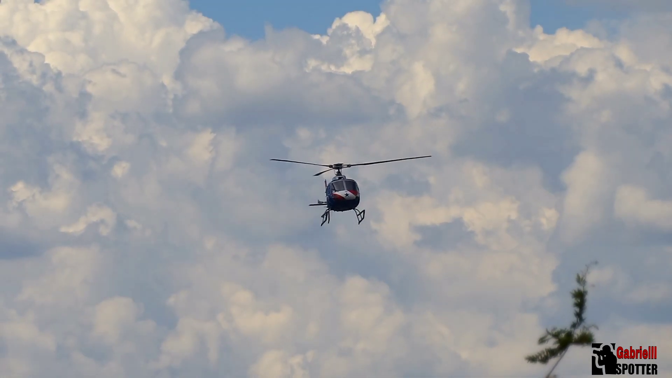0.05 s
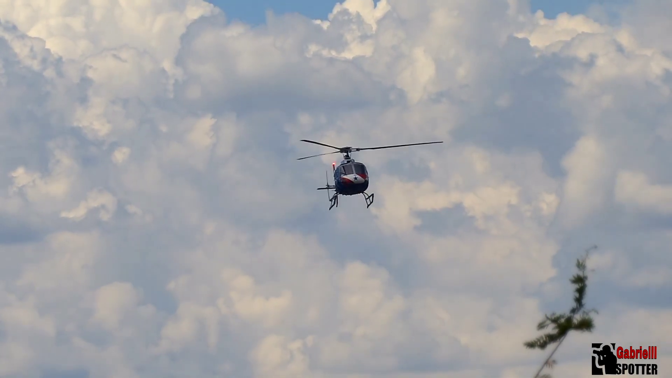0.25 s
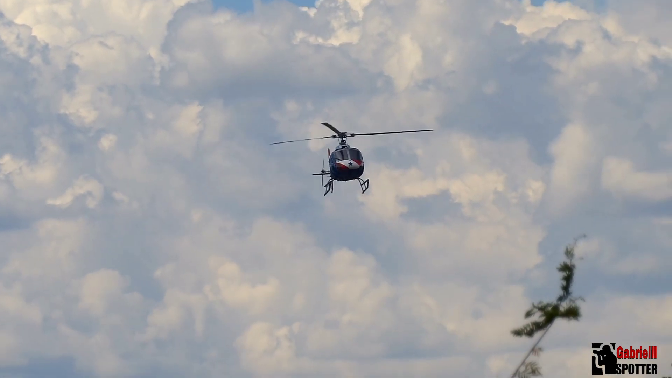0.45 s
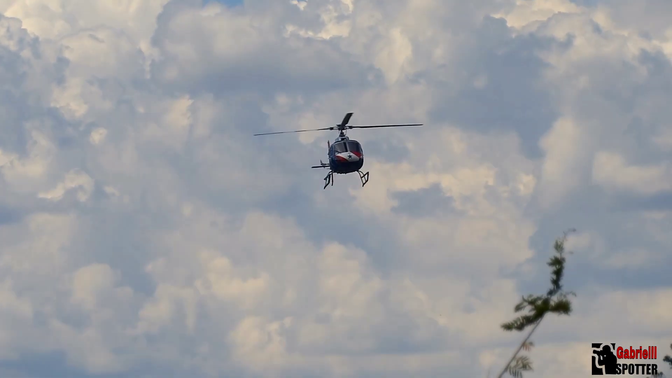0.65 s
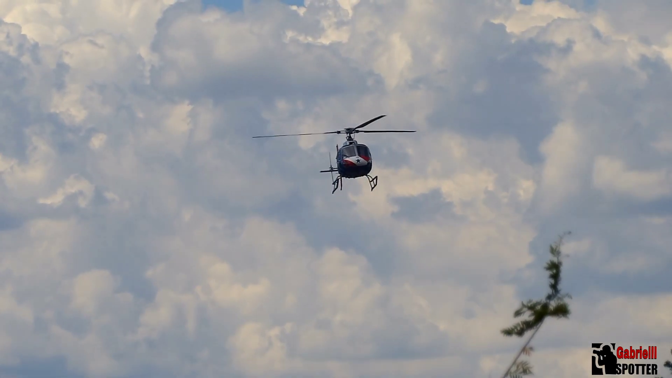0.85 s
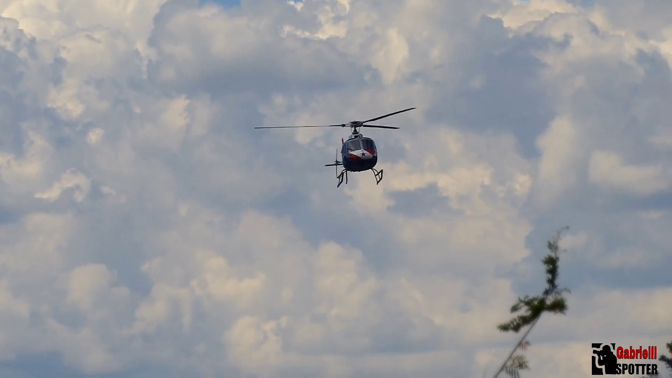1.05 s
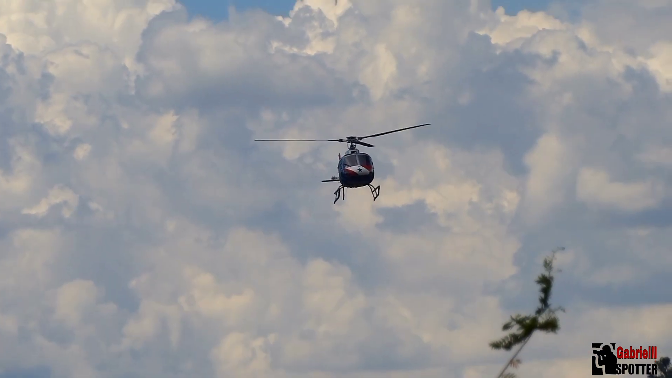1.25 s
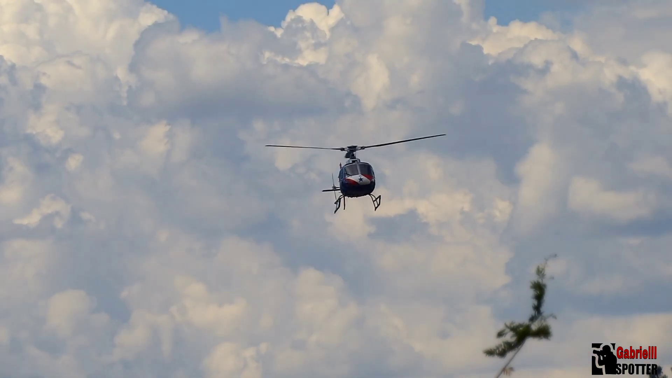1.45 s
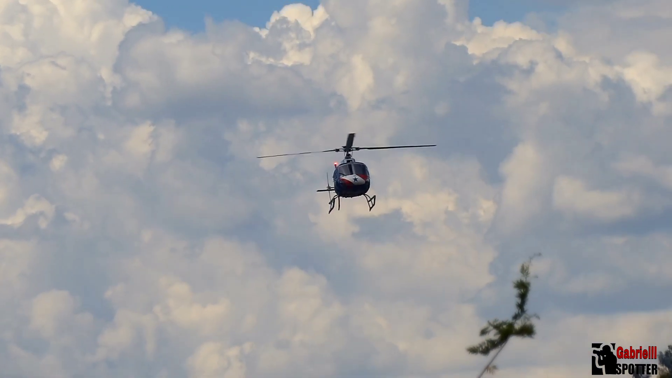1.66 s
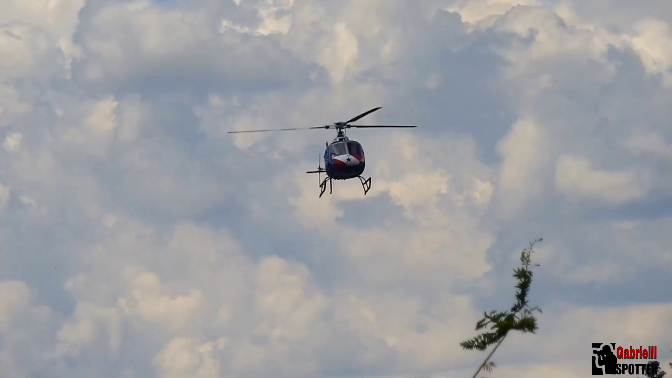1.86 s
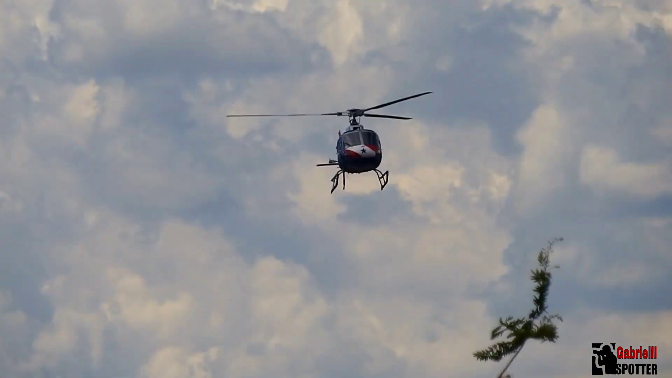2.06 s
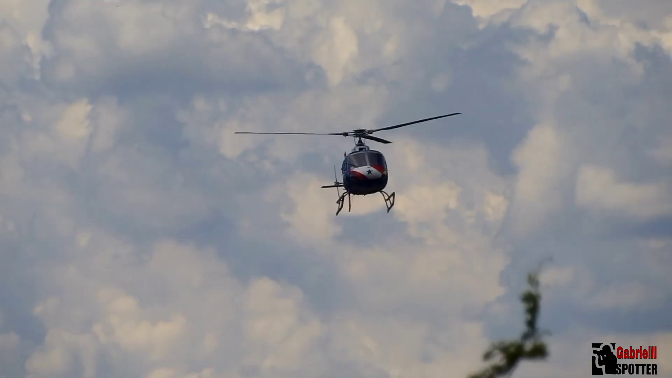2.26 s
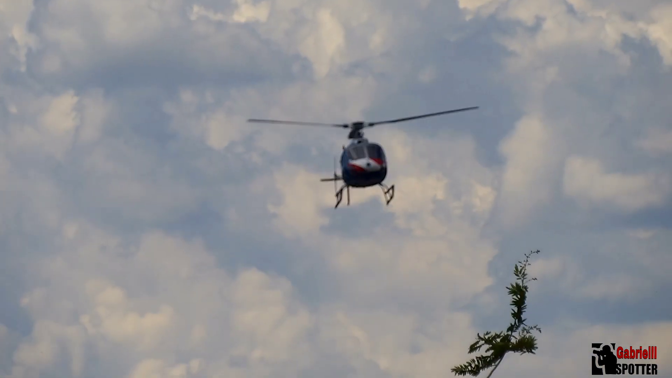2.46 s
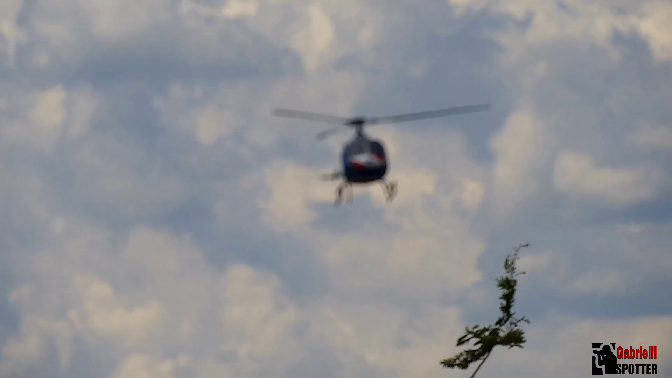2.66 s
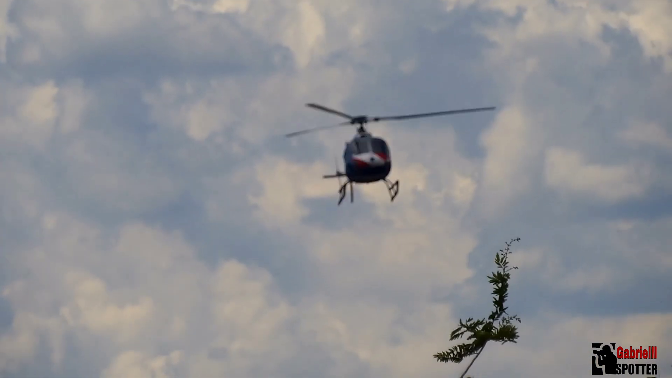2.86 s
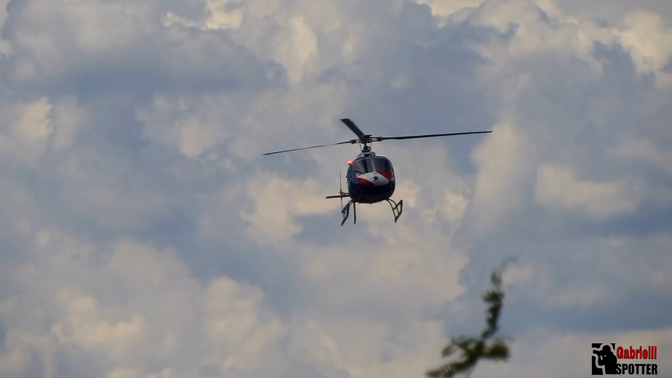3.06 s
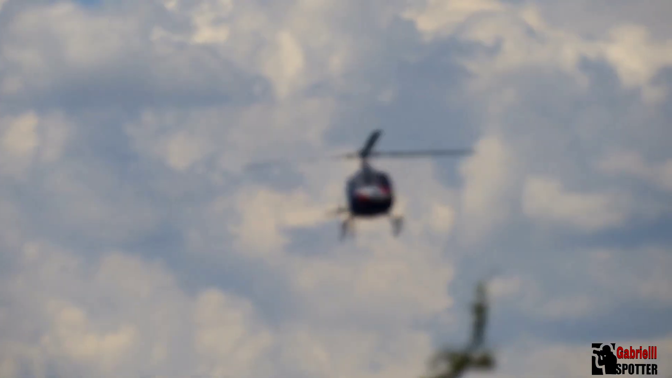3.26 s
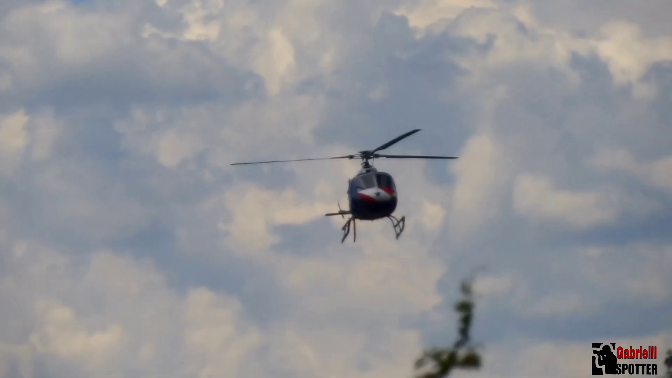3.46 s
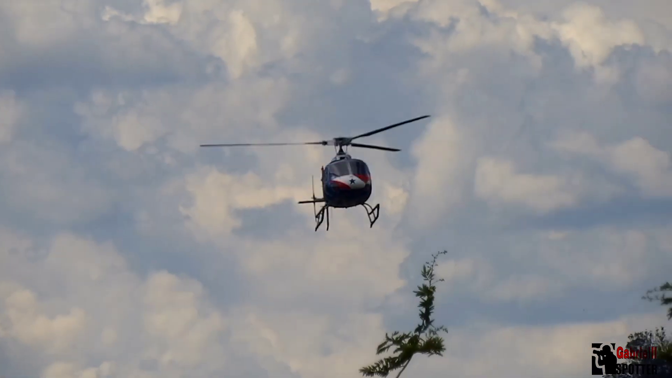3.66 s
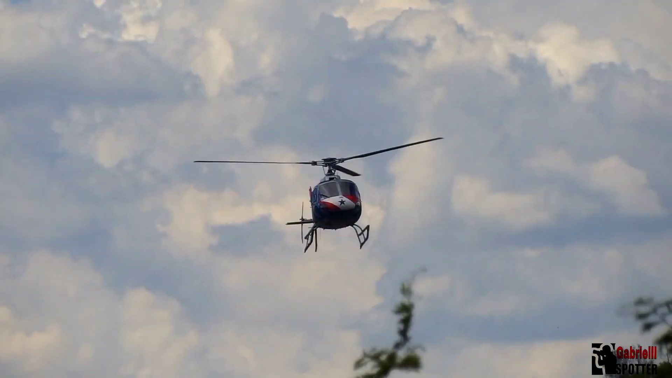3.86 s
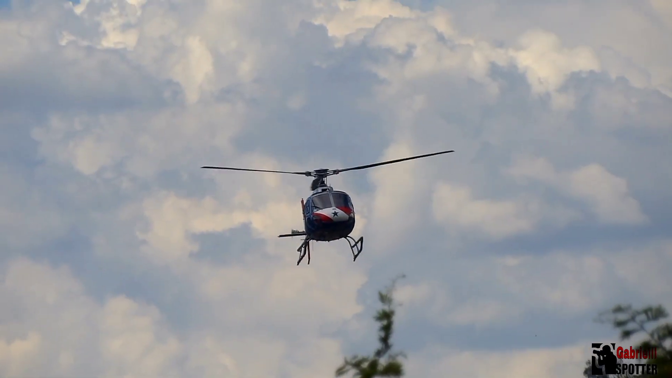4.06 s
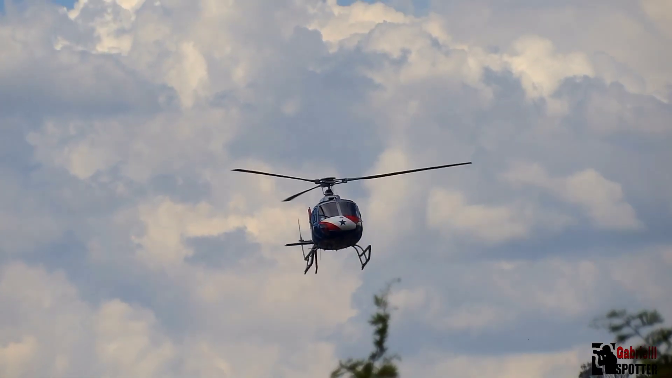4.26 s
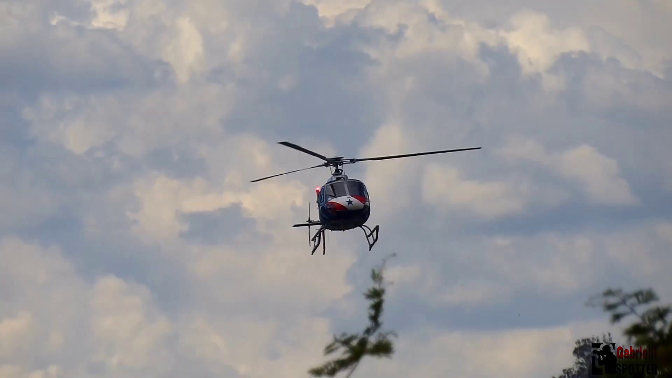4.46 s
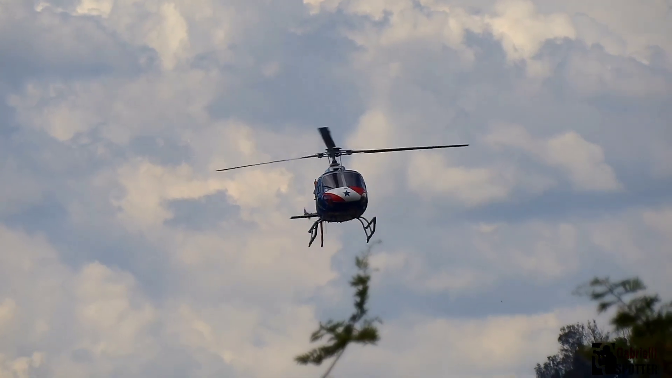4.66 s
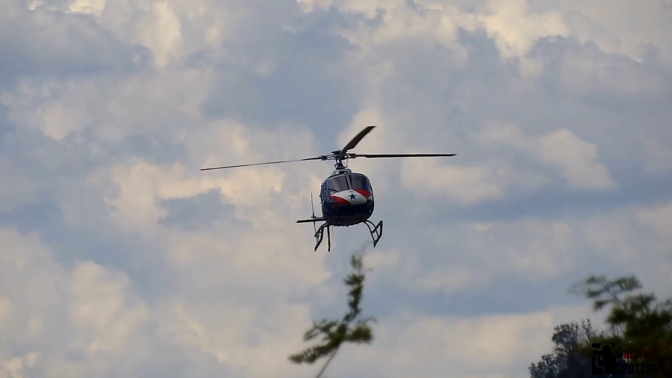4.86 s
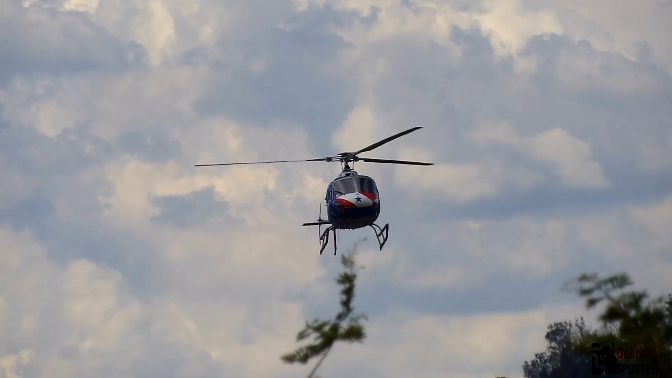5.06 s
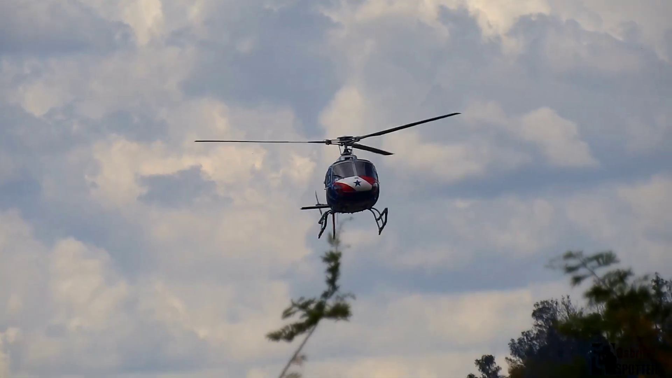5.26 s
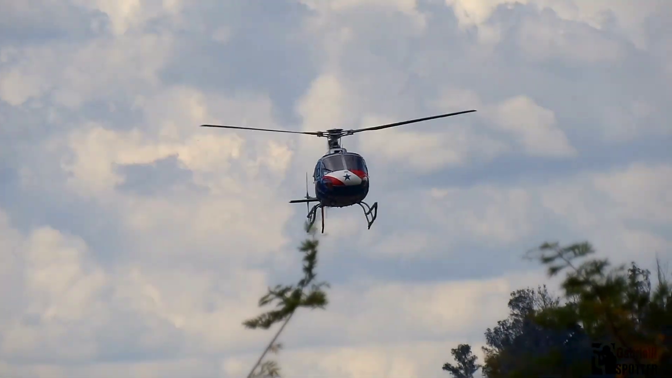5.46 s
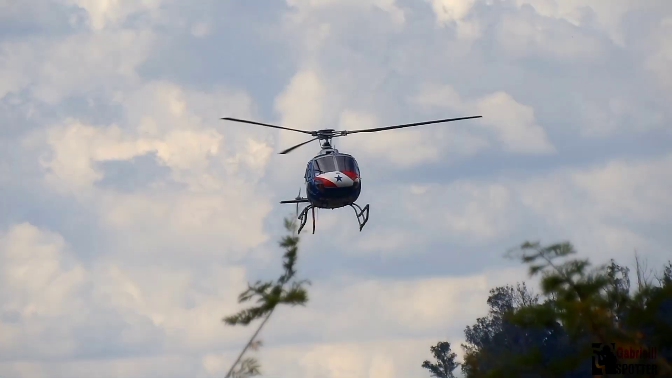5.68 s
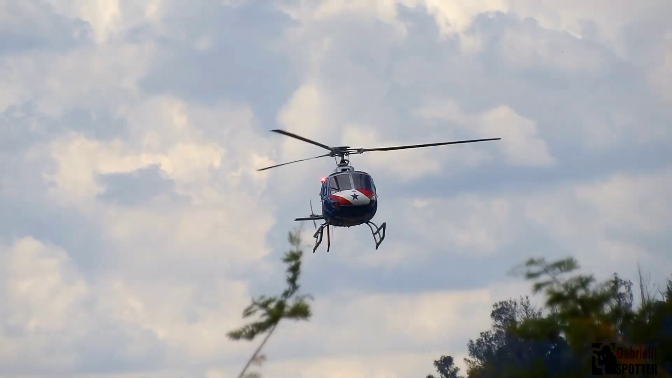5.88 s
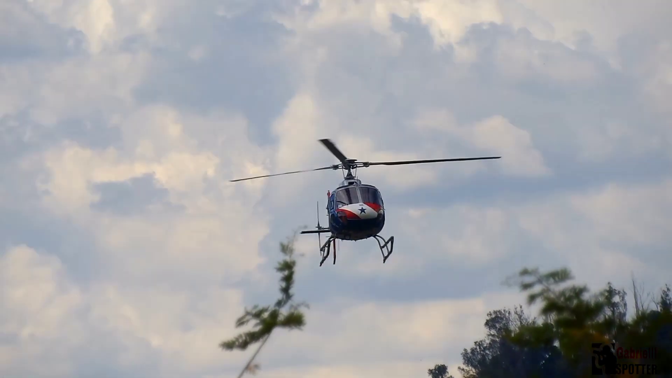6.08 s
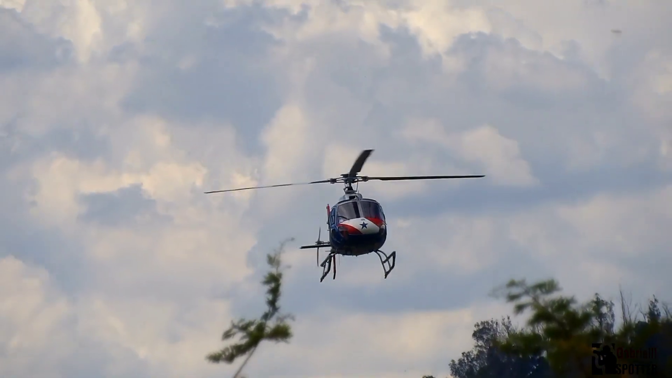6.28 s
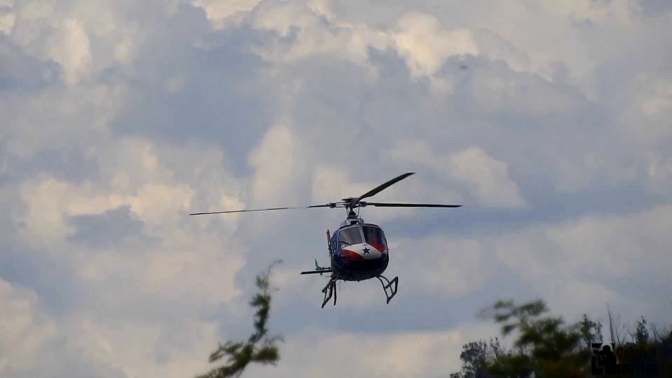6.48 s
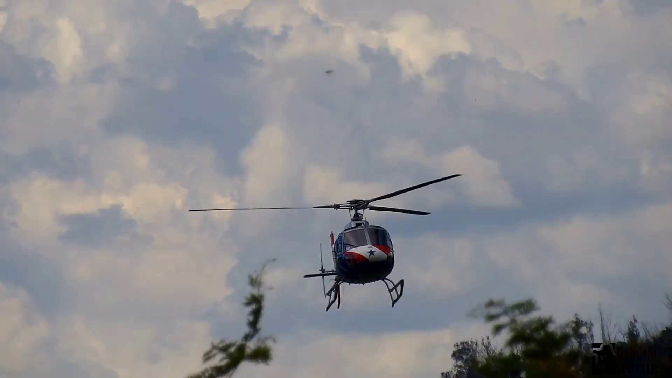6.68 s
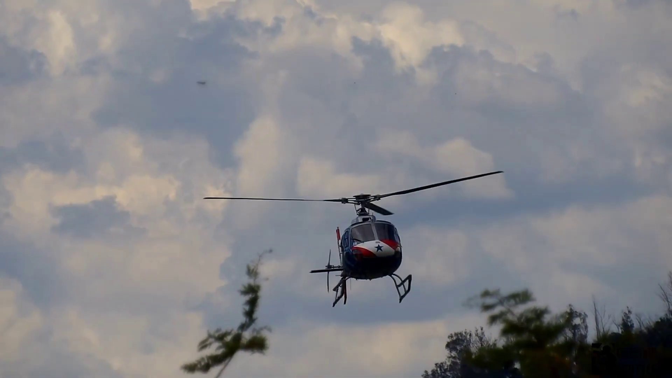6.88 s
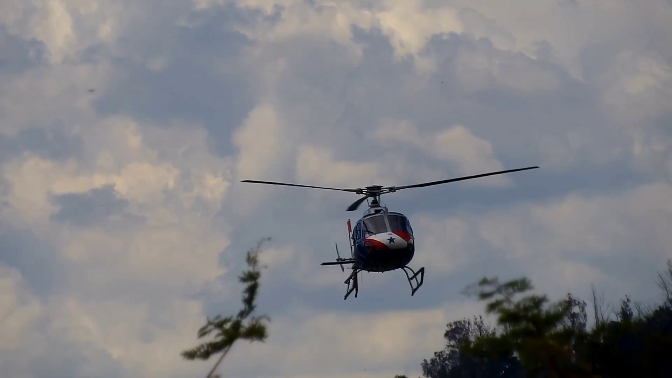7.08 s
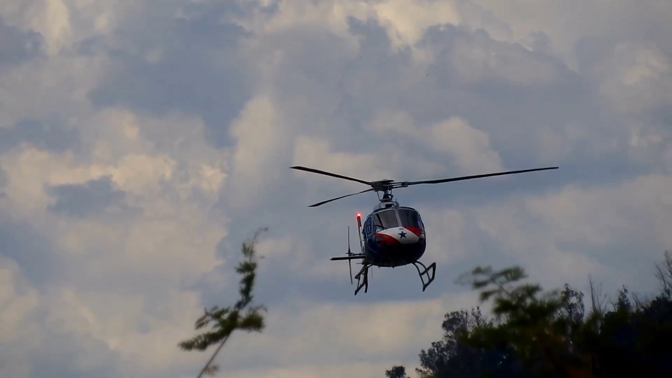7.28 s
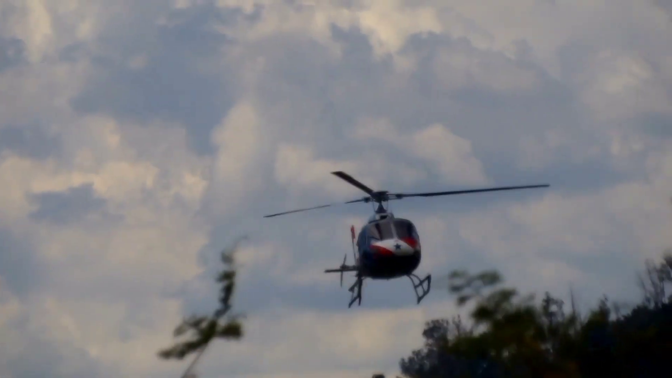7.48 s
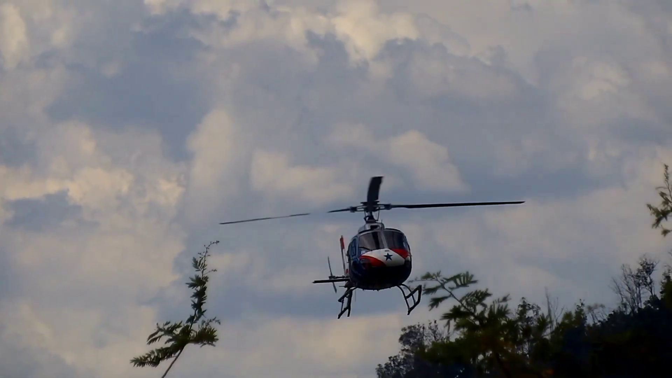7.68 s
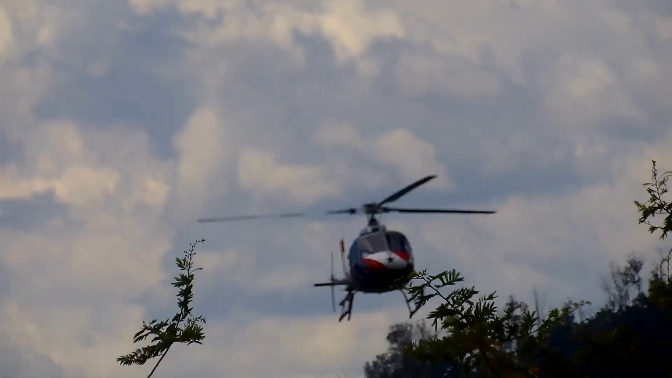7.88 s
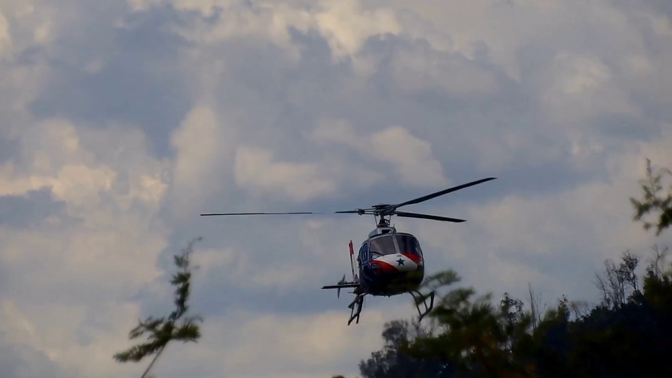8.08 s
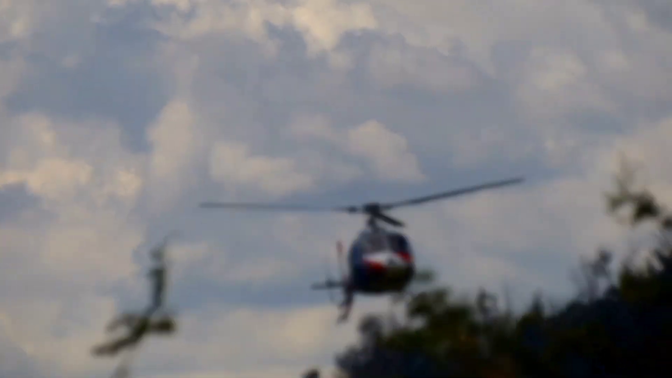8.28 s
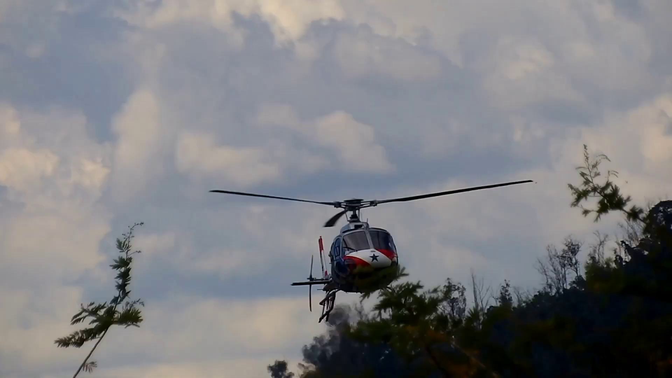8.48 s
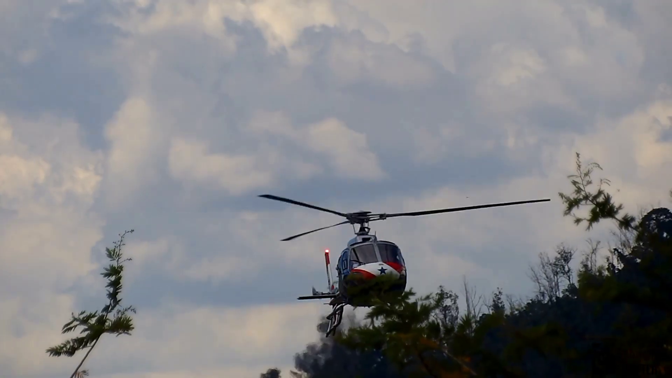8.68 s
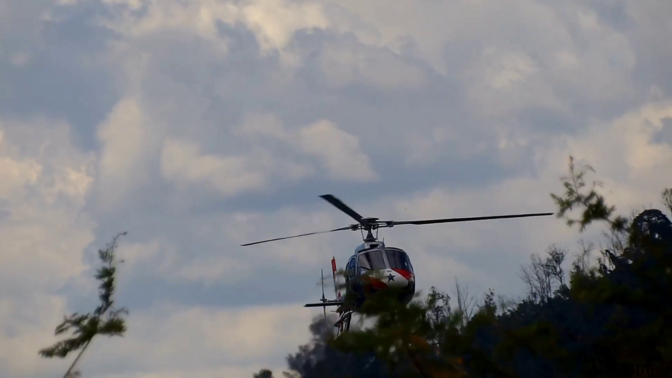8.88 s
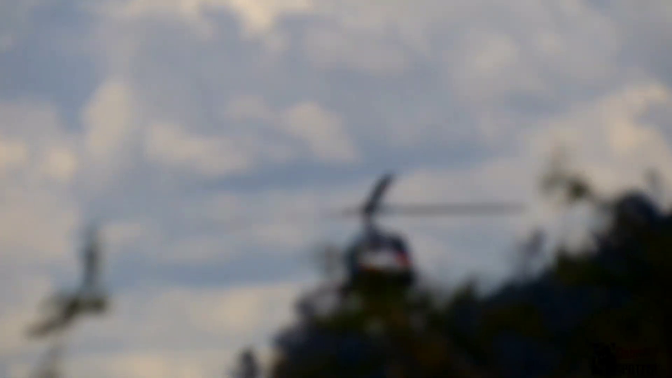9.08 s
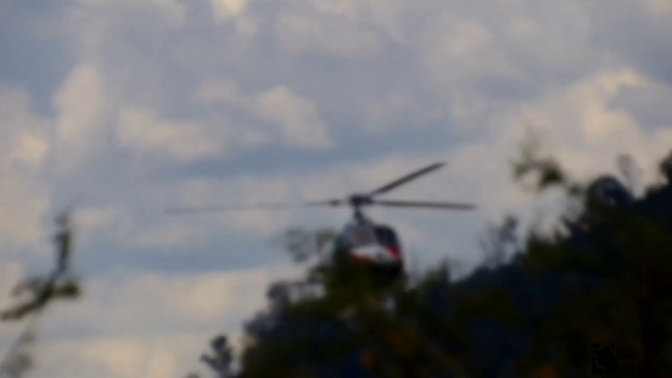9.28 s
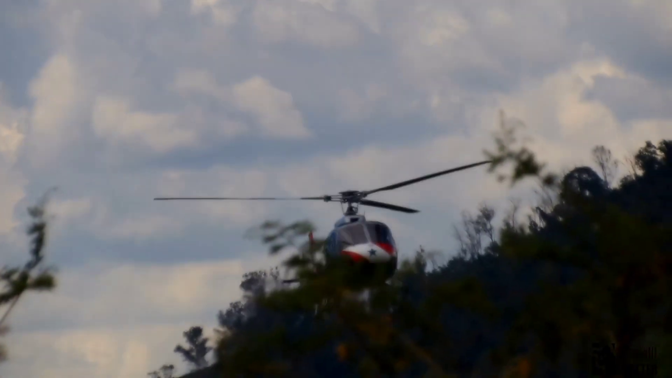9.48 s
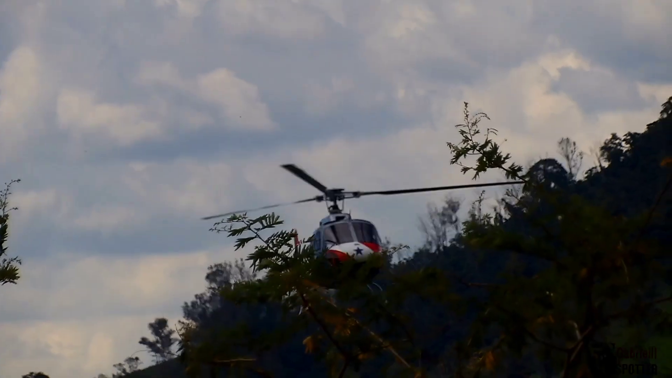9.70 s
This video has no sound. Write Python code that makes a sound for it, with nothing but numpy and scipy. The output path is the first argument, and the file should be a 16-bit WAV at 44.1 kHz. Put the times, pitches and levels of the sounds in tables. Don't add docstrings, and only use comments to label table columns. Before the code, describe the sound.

A turbine helicopter descends toward the listener, blades slapping fast and steadily over a growing jet roar, while wind gusts thump against the microphone.

```python
import sys
import numpy as np
from scipy import signal
from scipy.fft import rfft, irfft, next_fast_len
from scipy.io import wavfile
from scipy.ndimage import uniform_filter1d

SR = 44100
rng = np.random.default_rng(int(sys.argv[2]) if len(sys.argv) > 2 else 0)


def gain_from_db(level_db):
    decades = np.asarray(level_db, float) / 20
    return 10 ** decades


def unload_audio(sound):
    columns = np.transpose(np.atleast_2d(sound))
    steps = np.round(np.clip(columns, -1, 1) * 32767)
    wavfile.write(sys.argv[1], SR, steps.astype(np.int16))


N = 429534
T = np.arange(N) / SR


def curves(table):
    s, *columns = np.transpose(table)
    return [np.interp(T, s, column) for column in columns]


def unit(x):
    return x / np.sqrt(np.mean(x ** 2))


def colour(x, points):
    hz, db = np.transpose(points)
    size = next_fast_len(N + SR // 4)
    f = np.arange(1, size // 2 + 2) * SR / size
    gain = gain_from_db(np.interp(np.log(f), np.log(hz), db))
    return unit(irfft(rfft(x, size) * gain, size)[..., :N])


def noise(points, channels=1):
    return colour(rng.standard_normal((channels, N)), points)


def walk(rate):
    hold = int(SR / rate)
    levels = np.repeat(rng.standard_normal(N // hold + 1), hold)
    return 1.39 * uniform_filter1d(uniform_filter1d(levels, hold), hold)[:N]


def scatter(times, shape, half):
    at = np.round(times * SR).astype(int)[:, None] + np.arange(-half, half)
    inside = (at >= 0) * (at < N)
    out = np.zeros(N)
    np.add.at(out, np.clip(at, 0, N - 1), shape(at / SR - times[:, None]) * inside)
    return out


# (frequency [Hz], level [dB per Hz])
HISS = [(2940, -13), (5000, -5), (7790, -7), (11300, -6), (12900, -13), (15200, -11), (16000, -10)]


def hiss_and_motor():
    pause_s, length_s, edge_s = 1.762, .195, .03
    from_middle = np.abs(T - pause_s - length_s / 2)
    rest = np.clip(.5 + (length_s / 2 - from_middle) / edge_s, 0, 1)
    hiss_db = -71 - 5 * rest
    whirr_db = -4.5 - 27 * rest
    hiss_points = HISS[:2] + [(6300, -7.5), (7200, -9.0), (9000, -25.0), (9600, -8.5)] + HISS[3:]
    whirr_points = [(5800, -15), (6900, -2.5), (9200, 6.5), (10200, -24)]
    hiss = noise(hiss_points, channels=2) * gain_from_db(hiss_db + 7.5)
    return hiss + noise(whirr_points, channels=2) * gain_from_db(hiss_db + whirr_db + 1.0)


# (time [s], peak level [dB], frequency [Hz], left minus right [dB])
TICKS = [
    (1.237, -35.5, 5800, 13),
    (1.51, -35.5, 4900, 7),
    (1.512, -28.5, 2070, 13),
    (1.524, -42, 4960, 10),
    (1.635, -34, 2060, 14),
    (1.721, -49, 6000, -2),
    (1.734, -42, 10700, 4),
    (1.735, -40, 4000, 4),
    (1.999, -31.5, 6140, 8),
    (2.014, -38, 4900, 10),
]


def ticks():
    s, db, hz, pan_db = np.transpose(TICKS)[:, :, None]

    def ring(t):
        envelope = np.exp(-np.abs(t) / np.where(t < 0, .00012, .0007))
        return envelope * (np.sin(2 * np.pi * hz * t) + .8 * np.sin(1.15 * np.pi * hz * t))

    return np.array([scatter(s[:, 0] + 0.00067, lambda t: gain_from_db(db + 1.5 + side * pan_db) * ring(t), half=300)
                     for side in (.5, -.5)])


def gain_control_db():
    dip_s, dip_width_s, dip_db = 8.87, .1, -2
    duck_s, attack_s, drop_db, sink_db_s = 9.125, .06, -10, -24
    dip = dip_db * np.exp(-((T - dip_s) / dip_width_s) ** 2)
    drop = drop_db * np.clip((T - duck_s) / attack_s, 0, 1)
    return dip + drop + sink_db_s * np.maximum(T - duck_s, 0)


# (frequency [Hz], width [Hz], share of the band added or swallowed)
HOUSING = [
    (364.4, 58, -0.49),
    (814, 34, 0.55),
    (952, 120, -0.48),
    (1830, 250, 0.47),
    (4320, 190, 0.38),
]


def camera_housing(x):
    for hz, width_hz, share in HOUSING:
        edges = [hz - width_hz / 2, hz + width_hz / 2]
        x = x + share * signal.sosfilt(signal.butter(1, edges, "band", fs=SR, output="sos"), x)
    return x


# (frequency [Hz], level [dB per Hz])
BREEZE = [(20, -33.5), (50, -4.5), (90, -2), (130, -10), (250, -44), (600, -66)]


def breeze():
    return noise(BREEZE, channels=2) * gain_from_db(-42.5 + 2.2 * walk(11))


# (start [s], length [s], buffet level [dB], share on the left port [0-1], bright part [dB])
GUSTS = [(.6, 0.2, -38, 0.95, -15), (.89, .26, -23.5, .65, -20.5), (1.18, 0.25, -29, 0.6, -22),
         (1.997, 0.11, -28.5, 0.9, -15), (2.37, 0.21, -24, 0.74, -17), (2.674, 0.2, -33.5, .9, -25),
         (3.987, .23, -24.5, 1, -20), (4.28, .12, -45, 0.5, -17), (4.71, 0.1, -32, 0.8, -30),
         (5.004, 0.14, -27.5, 0.96, -22), (5.3, 0.15, -26, 1, -23), (5.593, 0.056, -25, 0.5, -19),
         (5.787, 0.08, -38, 1, -18), (5.973, .08, -30, 0.72, -35), (6.257, 0.17, -28, 0.66, -22),
         (7.735, 0.22, -29, 0.9, -24), (8.076, 0.4, -28.5, 0.87, -24), (8.597, 0.14, -19, .95, -10),
         (8.8, 0.055, -18.5, 0.92, -6), (8.91, .1, -21.5, .95, -15), (9.107, 0.11, -16, 0.98, -6.5),
         (9.235, 0.19, -20, 0.63, 0), (9.51, 0.21, -21, 0.75, 0)]


def gusts():
    rise_db_s, fall_db_s = 159, 171
    start, length, db, left, bright_db = np.transpose(GUSTS)[:, :, None]
    t = T[::64]
    slopes_db = rise_db_s * np.maximum(start - t, 0) + fall_db_s * np.maximum(t - start - length, 0)
    power = gain_from_db(2 * np.maximum(db - slopes_db, -90))
    left = np.clip(left, 0, 1)
    left_gain = (power * left).sum(axis=0) ** .5
    right_gain = (power * (1 - left)).sum(axis=0) ** .5
    brightness = (power * bright_db).sum(axis=0) / power.sum(axis=0)
    *ports, bright_db = (np.interp(T, t, c) for c in (left_gain, right_gain, brightness))
    return np.array(ports), bright_db


# (time [s], peak level [dB], share on the left port [0-1], bright part [dB])
EDDIES = [(0.422, -17, 0.3, -7), (0.734, -22.5, 1.0, -23), (0.806, -23, 1.0, -29), (1.005, -20.5, 0.6, -17),
          (1.125, -21, 0.7, -20), (2.124, -18, 0.95, -22), (2.204, -19, 0.85, -34), (2.265, -15, 0.02, -13),
          (2.303, -19.5, 0.5, -25), (2.45, -29.5, 1, 4), (2.761, -21, 0.97, -20), (4.09, -16.5, 0.99, -6),
          (4.161, -17, 0.6, -20), (5.068, -20, 0.97, 3), (5.362, -15, 0.93, -6), (5.443, -23, 0.84, -16),
          (6.085, -17.5, 0.6, -28), (6.187, -20.5, 0.7, -26), (6.321, -21, 1, -7), (7.72, -13.5, 0.96, -14),
          (8.388, -20, 0.8, -12), (8.495, -23, 0.54, -25), (9.121, -5.5, 0.99, -2), (9.264, -17, 0.75, 5.5),
          (9.374, -27, 1, 18.5), (9.494, -19, 0.6, 7), (9.547, -18, 0, 3.5), (9.439, -25.5, 1, 10),
          (9.62, -37, 0.76, 1), (9.667, -26, 0.5, -6)]


def eddies(dull, bright):
    s, peak_db, left, bright_db = np.transpose(EDDIES)
    out = np.zeros((2, N))
    for port, part in enumerate(np.clip([left, 1 - left], 0, 1) ** .5):
        for air, db in ((dull, peak_db), (bright, peak_db + bright_db - 2.0)):
            size = (part * gain_from_db(db))[:, None]
            out[port] += air[port] * scatter(s, lambda t: size * np.exp(-(t / 0.01) ** 2), half=1500)
    return out


# (frequency [Hz], level [dB per Hz])
DULL = [(18, -52), (30, -46), (75, -6.5), (130, 1), (260, -2.5), (370, -6.5), (600, -21.5), (1500, -88)]
# (frequency [Hz], level [dB per Hz])
BRIGHT = [(150, -24), (300, 3), (470, 7), (800, -4), (1490, -20), (2260, -41.5), (3500, -59), (4900, -98)]


def wind():
    buffet, bright_db = gusts()
    dull = noise(DULL, channels=2)
    snaps = (rng.random((2, N)) < 220 / SR) * rng.standard_normal((2, N))
    snap_points = [(hz, db + 5.6 * np.log2(hz / 470)) for hz, db in BRIGHT]
    bright = unit(noise(BRIGHT, channels=2) + 0.68 * colour(snaps, snap_points))
    lumps = np.array([3.02 * walk(35) + 3.2 * walk(90) for _ in range(2)])
    crackle = np.array([np.clip(3.3 * walk(170), -7, 6) - .5 for _ in range(2)])
    fast = np.clip(2.1 * gain_from_db(bright_db), 0, 1)
    deep = signal.sosfiltfilt(signal.butter(2, 110, fs=SR, output="sos"), dull)
    dull = dull - fast * deep
    thump = dull * gain_from_db(lumps * (1 - 0.83 * fast)) * (1 - 0.097 * fast)
    tearing = bright * gain_from_db(bright_db + 0.63 * lumps + crackle)
    return buffet * gain_from_db(-0.5) * (thump + tearing) + breeze() + eddies(dull, bright * gain_from_db(0.46 * crackle))


# (multiple of its blade rate, level [dB])
TAIL = [(1, -26), (2, -3), (3, 0), (4, -6), (5, -10), (6, -5), (7, -9), (8, -13), (9, -18)]
# (time [s], level [dB])
TAIL_LEVEL = [(0, -34.3), (3.9, -35.3), (4.6, -37), (9.74, -38)]


def tail_rotor(turns):
    phase = 2 * np.pi * 3.535 * turns + .04 * walk(6)
    hum = sum(gain_from_db(db + 1.2 * walk(4)) * np.sin(k * phase + k * k) for k, db in TAIL)
    return unit(hum) * gain_from_db(curves(TAIL_LEVEL)[0])


# (frequency [Hz], level [dB per Hz])
ROAR = [(35, -45.5), (60, -21.5), (103, -9), (185, -6), (250, -2.5), (314, -2.5), (372, -20.5), (542, -12),
        (935, -17), (1200, -17.5), (1510, -23.5), (2400, -27), (2900, -33.5), (4230, -39), (4700, -45),
        (9000, -63), (11700, -99.5), (19800, -120)]
# (time [s], level [dB])
JET_LEVEL = [(0, -48.5), (1.6, -48.5), (2.2, -50.5), (4.1, -49), (5.0, -44), (6.3, -43), (7, -42),
             (8.8, -40.5), (9.1, -38), (9.74, -36.5)]


def jet(turns):
    roar_db = curves(JET_LEVEL)[0]
    swell = 1 + 0.072 * np.cos(2 * np.pi * (turns - .1))
    low = noise(ROAR[:9] + [(1400, -80)])[0] * gain_from_db(0.61 * roar_db - 10.5 + 2.93 * walk(11))
    flicker_db = 0.65 * walk(15) + 1.3 * walk(160)
    high = noise([(600, -46.5)] + ROAR[8:])[0] * gain_from_db(roar_db - 1.0 + flicker_db)
    return swell * (low + high)


def slope_scatter():
    points = [(300, -39.5), (900, -21.5), (2000, -0.5), (4000, -3.5), (6000, -25.0), (9000, -42.0)]
    return noise(points)[0] * gain_from_db(curves(JET_LEVEL)[0] - 20.5) * np.array([[1], [-1]])


# (frequency [Hz], level [dB per Hz])
SWISH_AIR = [(700, -8), (1000, -9.5), (1200, 3), (1500, -9.5), (2400, -18.5), (2900, -19), (3300, -16),
             (4300, -18.5), (4800, -24.5), (6000, -33), (7500, -41.5), (9000, -73)]


def torn_air(times):
    puff = scatter(times - .0005, lambda t: np.exp(-(t / np.where(t < 0, .0055, .0095)) ** 2), half=1200)
    return colour(puff * gain_from_db(2.8 * walk(400)) * rng.standard_normal(N), SWISH_AIR)


# (frequency [Hz], level [dB per Hz])
CRACK = [(600, -25), (935, 6.5), (1200, 10.5), (1500, -8.5), (1800, 1.5), (2100, -3.5), (2400, 1),
         (2900, -14), (3300, -11.5), (4300, -30.5), (4800, -29.5), (7000, -39.5), (9000, -69)]
# (time [s], level under 1700 Hz [dB])
CRACK_BODY = [(0, -17), (1.8, 1), (2.6, -3), (3.3, -9), (4.2, 3), (5.5, 10), (7, -0.5), (9.74, 0)]


def vortex_crack(times, blade_db):
    size = gain_from_db(blade_db + 0.25 * rng.standard_normal(len(times)))[:, None]
    times = times - .0039
    front = scatter(times, lambda t: size * np.exp(-(t / .00006) ** 2), half=20)
    shed = scatter(times, lambda t: size * (t > 0) * np.exp(-np.abs(t) / 0.0046), half=1200)
    crack = colour(unit(front) + 3.5 * unit(shed * rng.standard_normal(N)), CRACK)
    body = signal.sosfiltfilt(signal.butter(2, 1700, fs=SR, output="sos"), crack)
    return crack + (gain_from_db(curves(CRACK_BODY)[0]) - 1) * body


# (delay [ms], level [dB], pulse frequency [Hz])
VORTICES = [
    (-6.6, -16, 300),
    (-3.6, -4, 330),
    (-1.6, -6, 560),
    (.3, 0, 470),
    (2.4, -11, 450),
    (5.3, -13, 420),
    (7.6, -20, 420),
]
# (time [s], middle vortex level [dB], its lateness [ms],
# late vortices level [dB], timing scatter [ms], pulse stretch [ratio])
WAKE = [(0, 2.5, 0.68, 11, 0.12, 1.19), (1.5, -3.5, 0.34, 7.5, 0.24, 1.21),
        (2.5, -5.5, 0.13, 5.5, 0.17, 1.11), (3.5, 1, 0.29, 1.5, 0.18, 1.074),
        (4.4, -2.5, 0.22, 3, 0.15, 1.025), (5.6, -1, 0.045, 9, 0.22, 1.01),
        (6.4, -8.5, 0.26, -8.5, 0.039, 1.2), (7.5, -2, 0.49, -5, 0.14, 1.265),
        (8.5, -0.5, 0.68, -4, 0.14, 1.22), (9.74, 8, 0.73, -9, 0.5, 1.4)]


def vortex_slaps(times, blade_db):
    skew = 1.1
    middle_db, middle_ms, late_db, scatter_ms, stretch = (c[(times * SR).astype(int)] for c in curves(WAKE))
    chance = rng.standard_normal((len(times), 2 * len(VORTICES)))
    slap = 0
    for k, (ms, db, hz) in enumerate(VORTICES):
        cut_db = db + middle_db * (k == 2) + late_db * (k > 3)
        size = gain_from_db(cut_db + blade_db + 1.1 * chance[:, 2 * k])[:, None]
        jitter_ms = scatter_ms * (0.78 * chance[:, 2 * k + 1] + chance[:, 0])
        at = times + (ms + middle_ms * (k == 2) + jitter_ms) / 1000
        speed = (np.pi * hz / stretch)[:, None]

        def pulse(t):
            x = speed * t
            return size * (1 - 2 * x ** 2 - skew * x) * np.exp(-x ** 2)

        slap = slap + scatter(at, pulse, half=300)
    return unit(signal.sosfilt(signal.butter(2, 130, "high", fs=SR, output="sos"), slap))


# (time [s], slap level [dB], crack minus slap [dB],
# torn air minus slap [dB])
BITE = [(0, -32, -17.5, -29), (.7, -34.5, -26, -34), (1.35, -35, -23.5, -35), (1.9, -29.5, -20.5, -38),
        (2.2, -28, -17.5, -46), (2.69, -27.5, -11.5, -35), (2.84, -30, -23.5, -38),
        (3.35, -24, -14.5, -39.5), (3.85, -24.5, -20, -36), (4.4, -32, -29.5, -25), (5.3, -30, -21, -27.5),
        (6.0, -32, -32, -20), (6.3, -31, -20.5, -24), (6.55, -23, -25, -38), (7.3, -22, -22, -30.5),
        (8.3, -21.5, -22.5, -37), (9.0, -28, -14.5, -21.5), (9.74, -18, -10.5, -30.5)]


def main_rotor(turns):
    times = np.interp(np.arange(np.ceil(turns[0]), turns[-1]), turns, T)
    blade_db = np.array([.8, -.6, -.2])[np.arange(len(times)) % 3] + 0.65 * rng.standard_normal(len(times))
    slap_db, crack_db, swish_db = curves(BITE)
    slap = vortex_slaps(times, blade_db)
    crack = vortex_crack(times, blade_db) * gain_from_db(crack_db + 3.0)
    swish = torn_air(times) * gain_from_db(swish_db + 12)
    return gain_from_db(slap_db) * (slap + crack + swish)


# (time [s], rate [passes per s])
BLADE_RATE = [(0, 20.6763), (1.2, 20.6895), (4.5, 20.5585), (7, 20.3381), (8.4, 20.2675), (9.74, 20.1035)]


def helicopter():
    turns = -.4247 + np.cumsum(curves(BLADE_RATE)[0]) / SR
    mono = main_rotor(turns) + jet(turns) + tail_rotor(turns)
    return mono * gain_from_db(np.array([[-.7], [.7]])) + slope_scatter()


def scene():
    return (helicopter() + hiss_and_motor() + ticks()) * gain_from_db(gain_control_db()) + wind()


def top_cut(x):
    return signal.sosfilt(signal.butter(12, 16280, fs=SR, output="sos"), x)


def record(dry):
    x = signal.sosfilt(signal.butter(2, 65, "high", fs=SR, output="sos"), dry)
    x = np.clip(camera_housing(x), -1, 1)
    x = signal.sosfilt(signal.ellip(10, .2, 70, 15800, fs=SR, output="sos"), x)
    return top_cut(x)


dry = scene()
out = record(dry)
unload_audio(out)
```